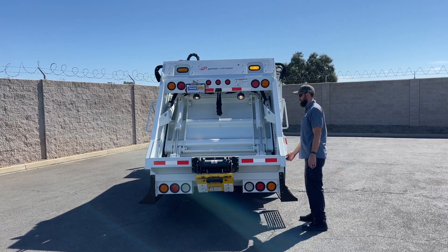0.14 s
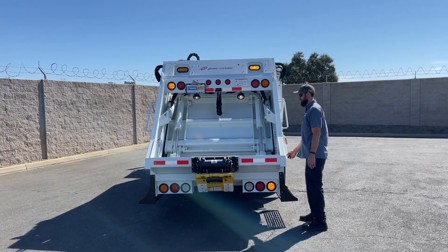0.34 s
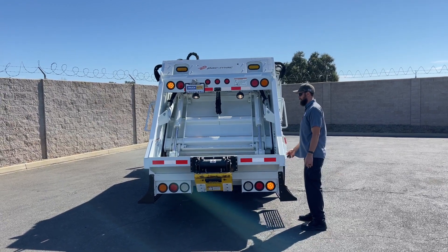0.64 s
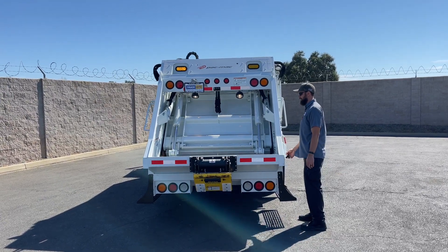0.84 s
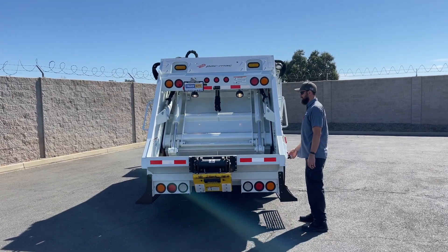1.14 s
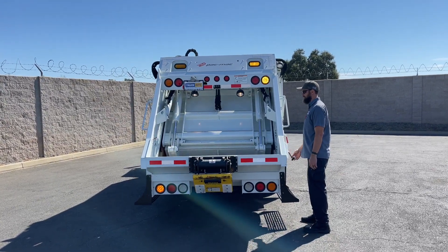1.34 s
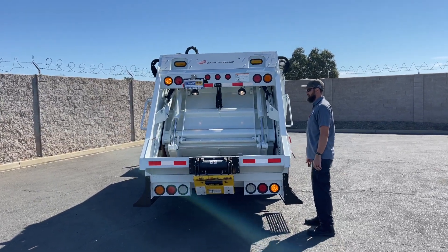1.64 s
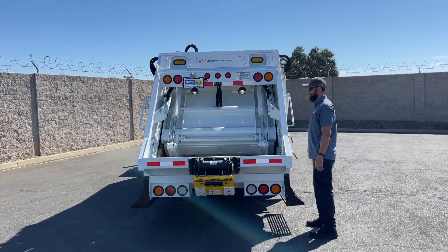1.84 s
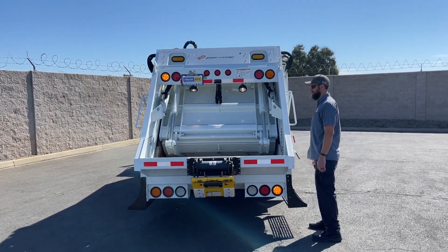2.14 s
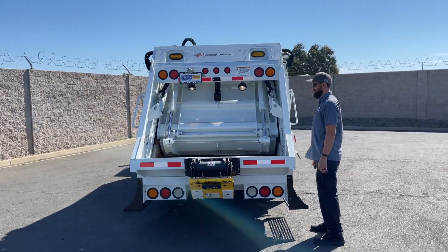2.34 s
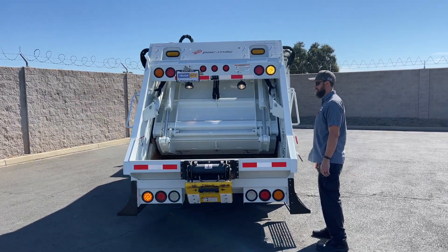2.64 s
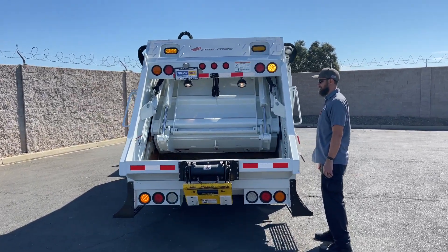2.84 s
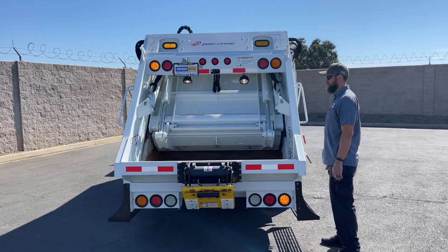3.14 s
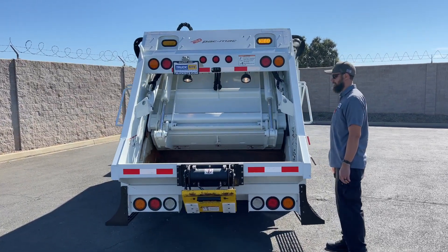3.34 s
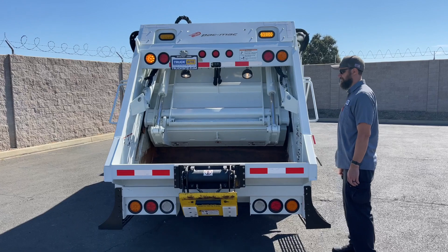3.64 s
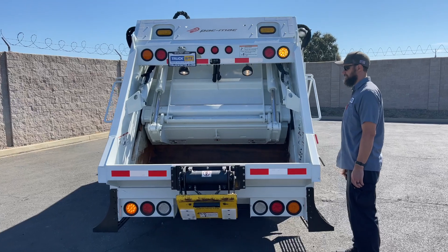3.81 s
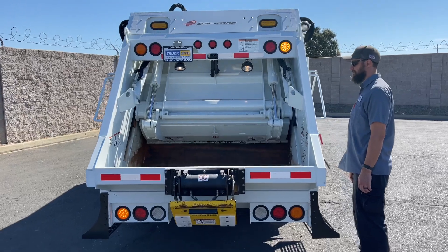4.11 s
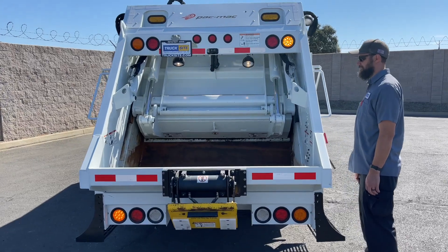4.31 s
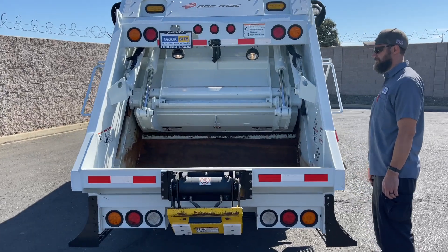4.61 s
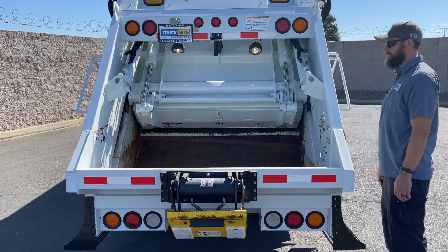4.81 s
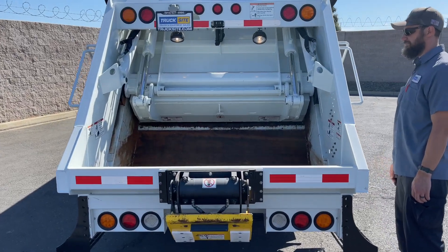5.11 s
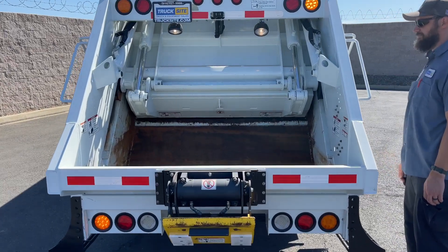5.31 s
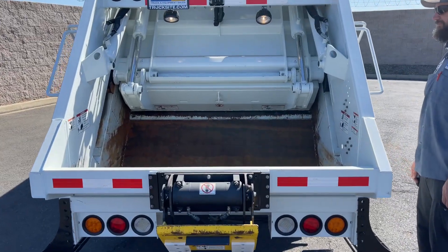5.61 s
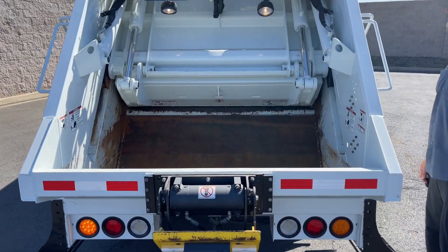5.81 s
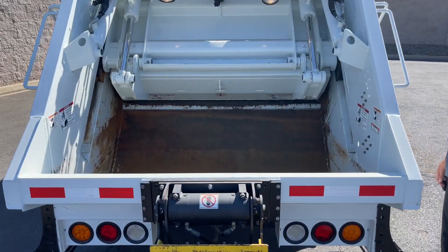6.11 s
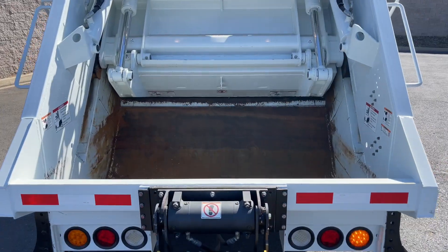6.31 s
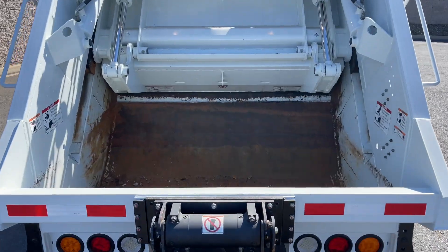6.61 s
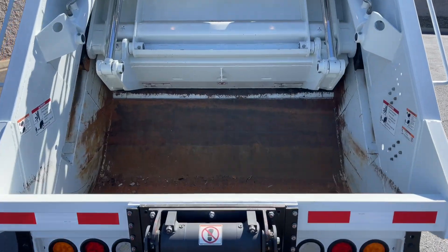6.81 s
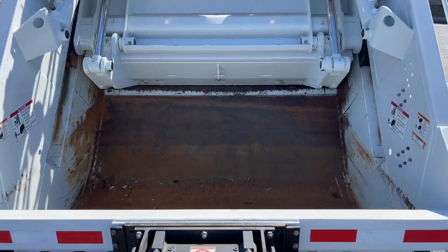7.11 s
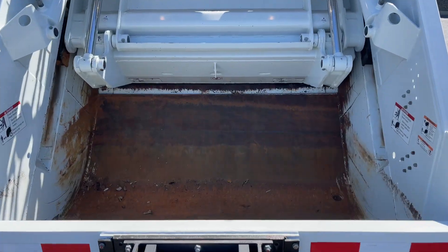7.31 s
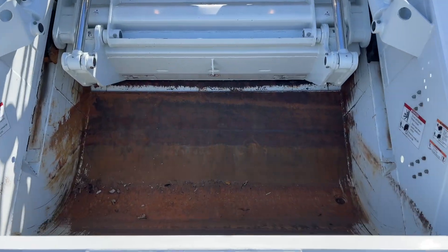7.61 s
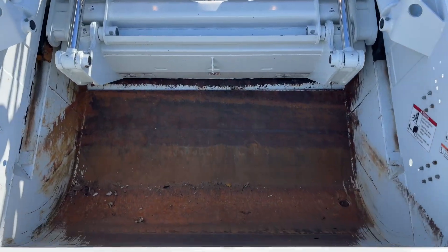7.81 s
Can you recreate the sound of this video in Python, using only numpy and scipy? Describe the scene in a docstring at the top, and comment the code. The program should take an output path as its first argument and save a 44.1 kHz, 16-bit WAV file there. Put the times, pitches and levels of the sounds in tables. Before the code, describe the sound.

A constant hydraulic drone, slightly wavering and swelling, dominates a diesel's low throb and fine mechanical clatter. The tail of one metal blow opens the scene; another bang rings almost at once, followed by several dull bassy thumps and later a looser cluster of steel knocks. Afterwards only the machine drone continues, fan and engine noise dulled behind the truck's tail, heard by a walking listener in an open yard.

```python
"""A gear pump drones as a refuse truck packs its load at high idle in a walled yard; the listener walks up to it.
Pump, four-cylinder firing, gear whine and clatter are sines locked to one wavering crank.
Fan, intake, oil flow and exhaust are shaped noise. The steel panel clunks at its stops: noise bursts
that die band by band over ringing plate modes. Dull thumps are short sines of falling pitch."""
import sys
import numpy as np
from scipy import signal
from scipy.io import wavfile
from scipy.ndimage import uniform_filter1d

SR = 44100
rng = np.random.default_rng(int(sys.argv[2]) if len(sys.argv) > 2 else 0)


def put_to_file(sound):
    """Save the sound as 16-bit audio at rate SR, in the file named by the first command-line argument."""
    columns = np.atleast_2d(sound).T  # one column per channel
    safe = np.clip(columns, -1, 1)
    whole_steps = np.round(safe * 32767)
    wavfile.write(sys.argv[1], SR, whole_steps.astype(np.int16))


N = 350595
T = np.arange(N) / SR  # seconds


def gain_of(db):
    """Amplitude factor of a level in dB."""
    return 10 ** (np.asarray(db) / 20)


def evened(x):
    """Scales a signal to rms 1."""
    return x / np.sqrt(np.mean(abs(x) ** 2) + 1e-20)


def read(points, hz):
    """Reads a (Hz, value) curve along a logarithmic frequency axis."""
    f, value = np.transpose(points)
    return np.interp(np.log(hz + 1), np.log(f + 1), value)


def columns(rows, t=T):
    """Draws each value column of a table against its first column, seconds."""
    s, *values = np.transpose(rows)
    return [np.interp(t, s, v) for v in values]


def wobble(hz):
    """Random drift of rms about 1, with little movement faster than hz."""
    knot_rate = 60  # per second
    knots = rng.standard_normal(int(N / SR * knot_rate) + 2)
    low_pass = signal.butter(2, np.clip(hz, .1, 29) / 30, output="sos")
    smooth = signal.sosfiltfilt(low_pass, knots)
    return np.interp(T * knot_rate, np.arange(len(knots)), evened(smooth))


def patches(hz, s):
    """Random blotches over frequency and time, rms 1."""
    grain = rng.standard_normal((len(hz), len(s)))
    return evened(uniform_filter1d(uniform_filter1d(grain, 9, 0), 12, 1))


# How far the truck's tail screens the engine as the listener comes in behind it.
# Each row: time in seconds, share from 0 to 1.
SCREEN = [(0, 0.19), (3.6, 0.13), (4.6, 0.1), (5.3, 0.37), (6.2, 0.87), (7.95, 0.99)]


def screened(open_db, behind_db):
    """A level that passes from its value in the open to its value behind the tail."""
    return open_db + (behind_db - open_db) * np.clip(columns(SCREEN)[0], 0, 1)


# Stereo balance. Each row: frequency in Hz, left over right in dB.
LEAN = [(60, 1), (99, 2.5), (160, -1), (270, 7), (450, 6), (730, 3), (1210, 8), (2000, 0), (3300, 1.5),
        (5450, 4.5), (9000, -1)]
# Stereo phase; tones take less of it below 1 kHz. Each row: frequency in Hz, lead of the left in radians.
LEAD = [(0, .05), (600, .12), (950, .6), (1290, .1), (1720, -1.4), (2410, .6), (2930, 1.2), (3620, .2),
        (5340, 1.2), (6550, -.2), (7410, .7), (8100, .6), (8870, -.2), (9130, -1.3)]


def tone(turns, hz, db, drift, lean=None):
    """A sine of rms level db between the microphone ports; its bearing drifts as the listener moves."""
    lean = read(LEAN, hz) if lean is None else lean
    half_lead = read(LEAD, hz) * min(hz / 1000, 1) / 2 + drift * wobble(0.69)
    angle = 2 * np.pi * (turns + rng.random())
    balance = np.tanh(lean * np.log(10) / 40)
    side = balance * np.sin(angle) + half_lead * np.cos(angle)
    return np.sqrt(2) * gain_of(db) * (np.sin(angle) + np.array([side, -side]))


# Stereo width of noise. Each row: frequency in Hz, left-right likeness from 0 to 1 at spread 1.
SAME = [(60, 1), (120, .97), (250, .98), (510, .9), (1050, .55), (2150, .5), (4400, .58), (9000, .62)]


def hiss(size, field_db, spread=1):
    """Two partly alike noises whose short-time spectrum is field_db(hz, s); a small spread is one compact source."""
    hop = size // 4
    hz = np.fft.rfftfreq(size, 1 / SR)[:, None]
    s = np.arange(N // hop + 5) * hop / SR
    a, b, c, d = rng.standard_normal((len(s), len(hz), 4)).T
    same = np.clip(read(SAME, hz), .01, 1) ** spread
    left = a + 1j * b
    right = same * left + np.sqrt(1 - same ** 2) * (c + 1j * d)
    right = right * np.exp(-1j * read(LEAD, hz))
    half_lean = read(LEAN, hz) / 2
    pair = np.array([left * gain_of(half_lean), right * gain_of(-half_lean)])
    return signal.istft(pair * gain_of(field_db(hz, s)), nperseg=size, noverlap=size - hop)[1][:, :N]


# Pump ripple, swelling as the listener crosses the yard's standing waves.
# Each row: time in seconds, level in dB before the falters and flutter.
PUMP = [(0, -14.5), (.26, -13), (.62, -15), (.98, -18), (1.93, -17.5), (2.28, -16), (3.11, -15.5),
        (3.66, -19), (4.08, -10.5), (4.65, -9), (5.45, -11), (5.87, -9), (6.08, -16.5), (6.2, -13.5),
        (7.83, -16), (7.95, -15)]
# Stereo balance of the ripple. Each row: time in seconds, left over right in dB.
PUMP_LEAN = [(0.0, 2.5), (1.13, -3), (3.0, 2.3), (3.63, -2), (3.96, 1.5), (6, 1), (7.95, 2)]
# The ripple falters around the clunks.
# Each row: start, fall, hold and recovery, all in seconds, then change of level in dB.
FALTERS = [(0.078, 0.028, 0.049, .05, -8.5), (0.102, 0.011, .004, 0.01, -27),
           (0.277, .02, .06, 0.097, -2.5), (0.41, 0.016, .01, 0.14, -5), (4.715, .12, 0.186, .035, -9),
           (4.92, 0.023, .005, 0.019, -17), (5.122, 0.015, 0.071, 0.11, -5.5)]
# Pump overtones, each with its own standing waves.
# Each row of the four: time in seconds, level in dB before the flutter.
SECOND = [(0, -36), (.45, -36), (.62, -29), (1.04, -30.5), (1.79, -33.5), (2.01, -32.5), (3.56, -28.5),
          (4.12, -23), (4.35, -26), (4.67, -37.5), (5.53, -43), (5.8, -36.5), (6.64, -44.5), (7.1, -37),
          (7.95, -38)]
THIRD = [(0, -41), (.62, -42.5), (1.04, -33), (1.79, -34.5), (2.17, -37), (2.45, -46), (2.61, -35.5),
         (2.92, -29.5), (3.3, -33.5), (3.74, -31.5), (3.9, -39.5), (4.3, -37.5), (4.67, -30), (4.95, -40.5),
         (6.22, -39.5), (7.1, -41.5), (7.48, -46), (7.95, -41)]
FOURTH = [(0, -47), (1.04, -58), (1.37, -45), (1.85, -44.5), (2.05, -62), (2.92, -48.5), (3.23, -39),
          (3.56, -38), (3.74, -46), (4.12, -39.5), (4.67, -38), (5.1, -47), (5.6, -39), (6.11, -41.5),
          (6.25, -49.5), (6.64, -51), (7.13, -36.5), (7.95, -40.5)]
SIXTH = [(0, -53.5), (5.2, -59), (5.45, -49), (6, -48.5), (6.3, -53), (7.95, -54)]
PULSES_PER_TURN = 10.2  # pump pulses per crank turn


def pump(crank):
    """A nearly pure pressure ripple with four overtones; each firing of the engine shakes it a little."""
    falter_db = sum(np.interp(T, np.cumsum(times), [0, db, db, 0]) for *times, db in FALTERS)
    ripple_db = columns(PUMP)[0] + falter_db + 0.2 * wobble(8.8)
    turns = crank * PULSES_PER_TURN
    ripple = tone(turns, 287, ripple_db, .03, columns(PUMP_LEAN)[0])
    for k, curve in {2: SECOND, 3: THIRD, 4: FOURTH, 6: SIXTH}.items():
        flutter_db = screened(0.82, 1.6) * wobble(15)  # stronger behind the tail
        ripple = ripple + tone(k * turns, k * 287, columns(curve)[0] + flutter_db, 0.14)
    shake = 1 + 0.022 * np.sin(4 * np.pi * crank)  # twice a turn
    return shake * ripple


# Firing note. Each row: time in seconds, level in dB before the flutter.
FIRING_NOTE = [(0, -31), (.6, -21.5), (1.8, -22), (2.3, -21), (3.6, -22), (4.6, -23.5), (5.1, -27.5),
               (5.9, -25), (7, -24.5), (7.95, -25)]
# Its 2nd and 3rd multiples. Each row: level in the open in dB, level behind the tail in dB, before the flutter.
FIRING = [(-34.5, -38.5), (-42.5, -34)]
# Gear whine. Each row: time in seconds, mesh level in dB, double mesh level in dB, before the flutter.
MESH = [(0, -47, -51), (.4, -37.5, -50), (.7, -39.5, -50.5), (1.77, -44, -45), (2.54, -37.5, -48.5),
        (2.81, -41, -42), (2.94, -37, -43.5), (3.83, -38, -48), (4.14, -42.5, -45), (4.78, -56, -54),
        (5.4, -46.5, -63), (5.9, -50.5, -48), (6.2, -52, -59), (7.17, -64.5, -46.5), (7.6, -62, -53),
        (7.95, -43.5, -52)]
# Strongest clatter lines. Each row: multiple of crank speed, level in dB relative to CLATTER_LEVEL.
CLATTER = [(8, 1), (12, 1.5), (28, -3.5), (38, -11), (44, -21), (46.92, -9.5), (51, -13), (65, -7),
           (66, -11), (67, -15), (69, -6), (70, -13), (71, -11), (72, -8.5), (77, -15), (79, -13.5)]
# Valve and injector clatter. Each row: time in seconds, reference level in dB for the lines.
CLATTER_LEVEL = [(0, -43.5), (.6, -42), (1.4, -43), (2.8, -40.5), (3.4, -43), (4.5, -42), (5.2, -42),
                 (5.85, -44.5), (6.2, -48), (7.95, -45)]
MESH_PER_TURN, MESH_JITTER = 47.92, .08  # tooth meetings per crank turn; rms error in meetings


def engine(crank):
    """Two firings a turn, a jittering gear mesh, and clatter lines at fixed multiples of crank speed."""
    levels = [columns(FIRING_NOTE)[0], *(screened(*db) for db in FIRING)]
    notes = sum(tone(2 * k * crank, k * 56, db + 0.3 * k * wobble(24), .05)
                for k, db in enumerate(levels, start=1))
    mesh = MESH_PER_TURN * crank + MESH_JITTER * wobble(12)  # teeth meet early or late
    mesh_db, double_db = columns(MESH)
    whine = tone(mesh, 1350, mesh_db + 1.5 * wobble(19), .8)
    whine = whine + tone(2 * mesh, 2500, double_db + 2.1 * wobble(22), 0.29)
    clatter_db = columns(CLATTER_LEVEL)[0]
    lines = sum(tone(k * crank, k * 28, clatter_db + db + 1.9 * wobble(5), 0.43) for k, db in CLATTER)
    return notes + whine + lines


# Colour of the exhaust flow and shaking body. Each row: frequency in Hz, relative density in dB per Hz.
RUMBLE = [(25, -33), (40, -6.5), (60, 4.5), (90, -0.5), (140, -4.5), (200, -4), (260, -4.5), (330, -13.5),
          (420, -16.5), (600, -54.5)]


def rumble():
    """Low noise of exhaust flow, and of the body shaking after each knock."""
    noise = hiss(2048, lambda hz, s: read(RUMBLE, hz) + 1.3 * patches(hz, s))
    power = gain_of(2 * screened(-31.5, -35))
    power = power + shudder(BLOWS, down_db=-8, t60=3.5) + shudder(THUMPS, down_db=-26.5, t60=2.3)
    return np.sqrt(abs(power)) * evened(noise)


def shudder(knocks, down_db, t60):
    """Power of the rumble after knocks: it starts down_db from each knock's level and falls 60 dB in t60 seconds."""
    power = sum((T > s) * gain_of(2 * (db + down_db - 60 * abs(T - s) / t60)) for s, db, *_ in knocks)
    return uniform_filter1d(power, size=1000)  # softens the onsets


# Colour of fan, intake and oil flow. Each row: frequency in Hz, relative density in dB per Hz.
ROAR = [(350, -28.5), (450, -24.5), (650, -22), (800, -26.5), (950, -29.5), (1150, -25), (1600, -27.5),
        (2770, -30.5), (3200, -34), (5000, -39.5), (7000, -46), (8800, -52), (9500, -50.5)]
# Body resonances. Each row: frequency in Hz, width in Hz, boost in dB.
HOLLOWS = [(1910, 470, 3.5), (2800, 200, 5), (3930, 440, 4.5), (8020, 770, 8.5)]
# Change of colour at the hopper mouth. Each row: frequency in Hz, full change in dB.
NEAR = [(500, -1), (900, 6.5), (1400, -4), (2100, -1), (3000, -2), (3750, 3.5), (4500, -0.5), (6000, 3),
        (9000, 2)]
# The listener's approach. Each row: time in seconds, nearness from 0 to 1.
WALK = [(0, 0.2), (4.5, 0.4), (6, 0.8), (7.95, 1)]


def roar(crank):
    """Fan, intake and oil flow: patchy noise in the body's hollows, puffing with the firings."""
    def field_db(hz, s):
        hollows = sum(db / (1 + (2 * (hz - f) / w) ** 2) for f, w, db in HOLLOWS)
        low_cut = -24 * np.maximum(np.log2(ROAR[0][0] / (hz + 1)), 0)  # dB, 24 per octave
        approach = read(NEAR, hz) * columns(WALK, s)[0]
        return read(ROAR, hz) + low_cut + hollows + approach + patches(hz, s)
    firing_puffs = 0.042 * np.sin(4 * np.pi * crank)
    turn_puffs = 0.03 * np.sin(2 * np.pi * crank)
    puffs = 1 + firing_puffs + turn_puffs + 0.058 * wobble(23)
    return gain_of(screened(-31.5, -36)) * puffs * evened(hiss(2048, field_db))


# Panel blows; the first falls before the start, so only its tail sounds.
# Each row: time in seconds, relative thud, boom and crack in dB, crack brightness in dB per octave.
BLOWS = [(-.12, -11, -11, -46.5, 0), (0.358, -36.5, -34.5, -35, 3.5), (0.371, -13.5, -12.5, -33, -3),
         (0.406, -19.5, -20.5, -38, -3.5), (0.435, -26, -27, -49.5, -4), (4.713, -34, -14, -54, -5),
         (4.728, -25.5, -15.5, -44.5, -5.5), (4.749, -27, -12.5, -26.5, -1.5), (4.786, -25, -10, -25, -0.5),
         (4.8, -21, -23, -32.5, -2.5), (4.836, -31, -29, -35.5, 2.5), (4.865, -26.5, -26, -42.5, -1.5),
         (4.88, -35, -35, -39.5, -1.5), (4.938, -36, -33, -52, 2), (4.995, -37.5, -41, -43.5, 1)]
# Colour of the boom, then of the crack. Each row: frequency in Hz, relative level in dB.
BOOM = [(40, -39.5), (170, -14.5), (340, 1.5), (480, -5.5), (680, 2.5), (1000, -4), (1500, -10),
        (3000, -35.5)]
CRACK = [(600, -14), (1500, -0.5), (2500, 6), (3700, 4), (5500, 0.5), (9000, -13)]
# Reverberation of hopper and yard. Each row: frequency in Hz, 60 dB decay in seconds.
RING = [(60, 1.9), (200, 0.87), (700, 1.21), (2000, 0.78), (4000, 0.2), (9000, 0.4)]
# Plate modes. Each row: central frequency in Hz, relative level in dB, 60 dB decay in seconds.
HOPPER = [(79.35, -3.5, 1.9), (106, -3, 0.7), (127, -9.5, 1.1), (145.3, -3, 0.61), (175.3, -7, 1.68),
          (233.3, 1, 0.4), (260, -14.5, 0.99), (348.3, -9, 1), (577, -13.5, 1.3), (666, -5.5, 0.27),
          (695, -12, 0.49), (830, -15.5, 0.26), (896, -7, 0.19), (1414, -24.5, 0.3), (2410, -2.5, 0.16),
          (3200, 4, .1), (3666, 5, .14), (4320, -14, .12), (5460, -11, 0.062)]


def panel():
    """Each blow: a noisy boom and crack dying band by band, and the hopper's plates ringing."""
    return gain_of(-8) * hiss(256, blow_field_db, spread=0.37) + gain_of(-3.0) * plates()


def blow_field_db(hz, s):
    """Spectrum of the blows' noise: a direct burst over a longer tail, with bass building up more slowly."""
    power = 1e-14
    for at, _, boom_db, crack_db, bright in BLOWS:
        age = s - at
        since = np.maximum(age, 0)
        early = .8 * np.exp(-since / .012)
        late = 0.27 * gain_of(-120 * since / read(RING, hz))
        rise = np.clip(age / (0.006 + 1.8 / (hz + 30)), 0, 1) ** 2
        boom = boom_db + read(BOOM, hz)
        crack = crack_db + read(CRACK, hz) + bright * np.log2((hz + 1) / 3000)
        power = power + rise * (gain_of(2 * boom) + gain_of(2 * crack)) * (early + late)
    grain = rng.standard_normal((len(hz), len(s)))
    rattle = evened(uniform_filter1d(uniform_filter1d(grain, 14, 0), 4, 1))
    return 10 * np.log10(power) + 1.2 * rattle  # loose parts make the decay lumpy


def plates():
    """Struck steel modes as decaying sines; every blow lands on another spot, so pitch, phase and level vary."""
    out, age = np.zeros(N + SR), np.arange(SR) / SR
    hz, db, t60 = np.transpose(HOPPER)[:, :, None]
    for at, thud_db, boom_db, crack_db, _ in BLOWS:
        detune, phase, luck = rng.random((len(HOPPER), 3, 1)).transpose(1, 0, 2)
        pitch = hz * (1 + 0.0455 * (detune - .5))
        onset = np.minimum(age * hz / 2.0, 1)  # two cycles to full swing
        swing = np.sin(2 * np.pi * (pitch * age + phase)) * onset
        blow_db = read([(130, thud_db), (190, boom_db), (1400, boom_db), (2000, crack_db)], hz)
        level_db = blow_db + db + 1.9 * (luck - .5)
        ring = (gain_of(level_db - 60 * age / t60) * swing).sum(0)
        start = round(at * SR)
        out[max(start, 0):start + SR] += ring[max(-start, 0):]
    return out[:N]


# Dull low thumps.
# Each row: start in seconds, level in dB before onset and decay, settled pitch in Hz, 60 dB decay in seconds.
THUMPS = [(1.819, -15, 90, 0.083), (2.13, -2.5, 66, .15), (2.2, -11, 70, .12), (2.287, -13, 88, 0.17),
          (2.509, -19.5, 75, 0.12), (2.603, -3, 98, .11), (2.666, -23, 95, 0.071),
          (2.931, -13.5, 95.1, 0.12), (4.247, -22.5, 65, 0.086)]


def thumps():
    """Short low swings: a soft push with a falling pitch and two weaker upper modes."""
    out = np.zeros(N)
    for at, db, hz, t60 in THUMPS:
        age = np.maximum(T - at, 0)
        glide = 0.0094 * (1 - np.exp(-age / 0.0087))  # starts about an octave high
        angle = 2 * np.pi * hz * (age + glide)
        swing = np.sin(angle) + .35 * np.sin(1.6 * angle) + .12 * np.sin(2.4 * angle)
        push = 1 - np.exp(-(age / .012) ** 2)
        out = out + gain_of(db - 60 * age / t60) * push * swing
    return out


# Speed of the pump, wavering slightly. Each row: time in seconds, pump tooth rate in Hz.
SPEED = [(0, 287), (.7, 286.6), (2.3, 286.2), (3.3, 287.7), (3.7, 286.6), (4.2, 287.6), (4.9, 288.6),
         (5.4, 287), (6.1, 288.4), (7.95, 287.2)]


def scene():
    """One crank drives pump and engine; flow noise, panel blows and thumps join them."""
    crank = np.cumsum(columns(SPEED)[0]) / SR / PULSES_PER_TURN  # crank turns; the pump is geared to it
    return pump(crank) + engine(crank) + rumble() + roar(crank) + panel() + thumps()


def record(dry):
    """The microphone drops the deepest bass; peaks round off softly; then the band limit."""
    longer = np.pad(dry, ((0, 0), (4255, 255)), "reflect")  # lets both filters settle
    bass_cut = signal.butter(2, 42, "high", fs=SR, output="sos")
    thin = signal.sosfilt(bass_cut, longer)[:, 4000:]
    rounded = thin / (1 + (thin / .98) ** 4) ** .25
    band_limit = signal.firwin(511, 9550, window=("kaiser", 9), fs=SR)  # low-pass, Hz
    return signal.oaconvolve(rounded, band_limit[None], "valid", axes=1)


dry = scene()
out = record(dry)
put_to_file(out)
```